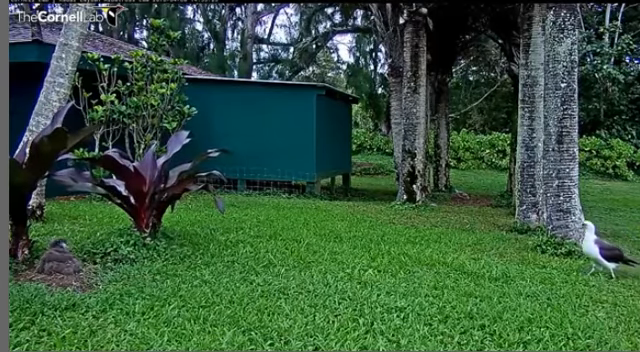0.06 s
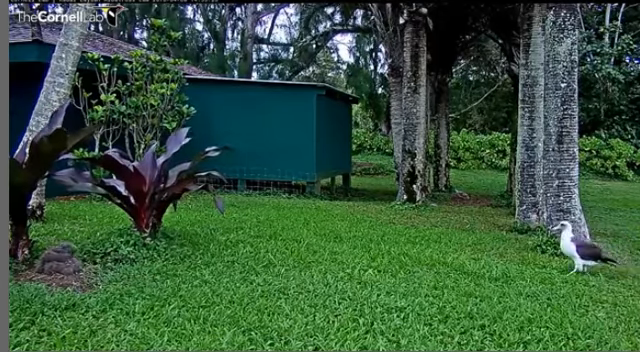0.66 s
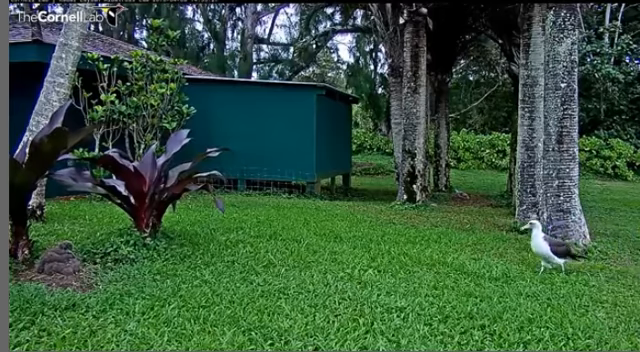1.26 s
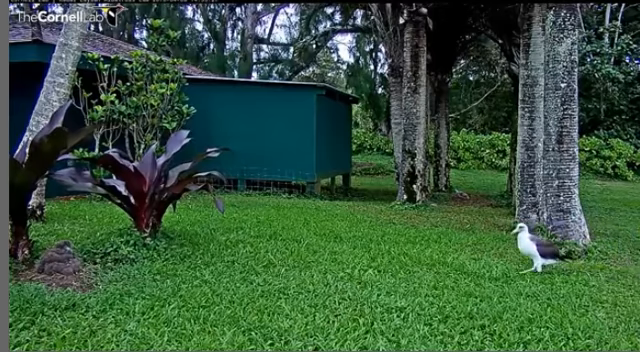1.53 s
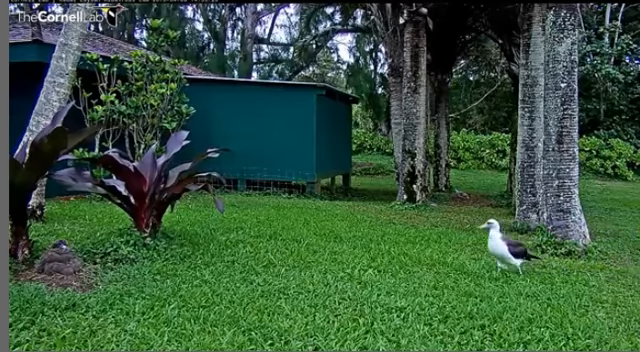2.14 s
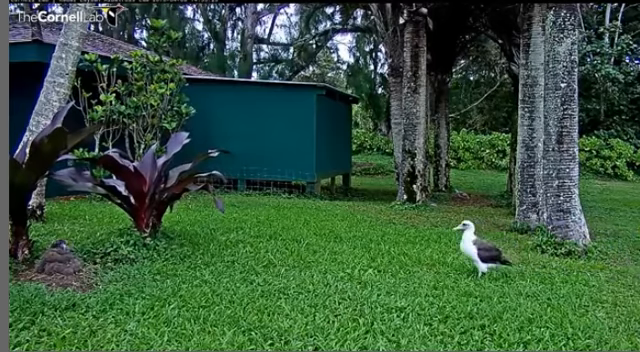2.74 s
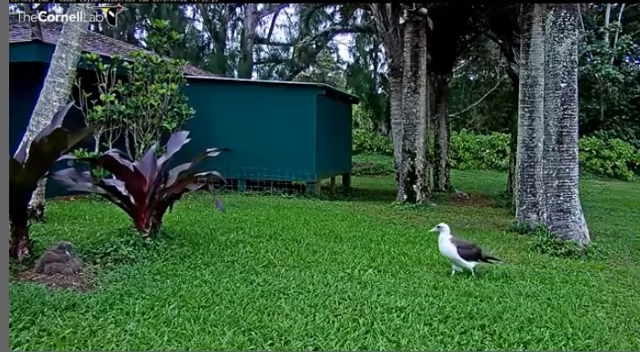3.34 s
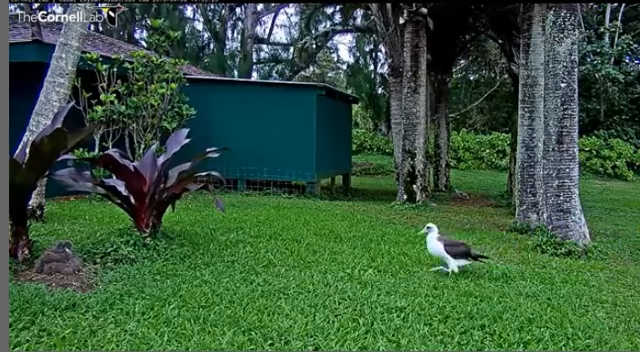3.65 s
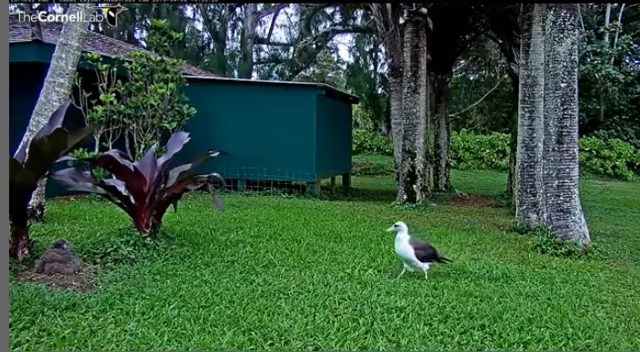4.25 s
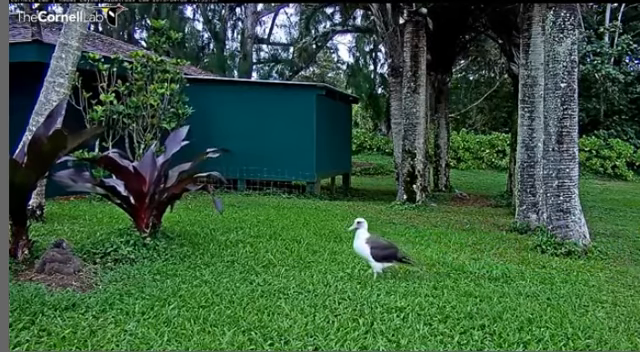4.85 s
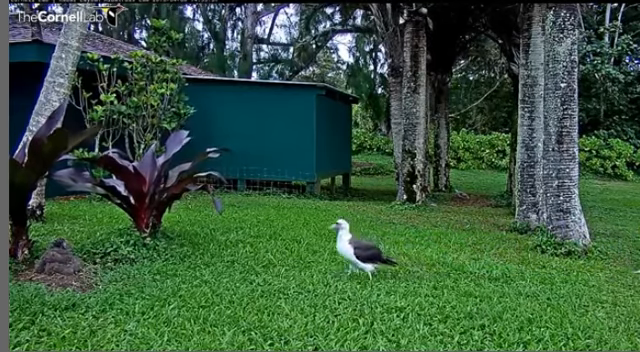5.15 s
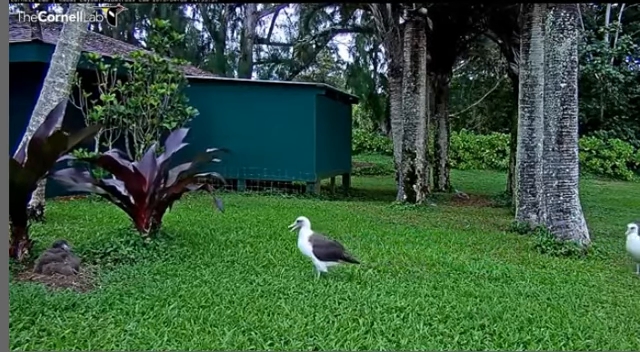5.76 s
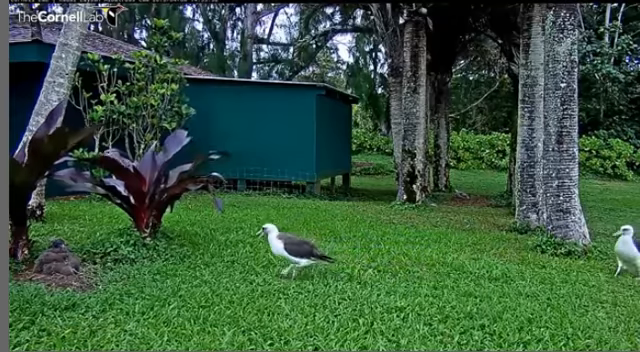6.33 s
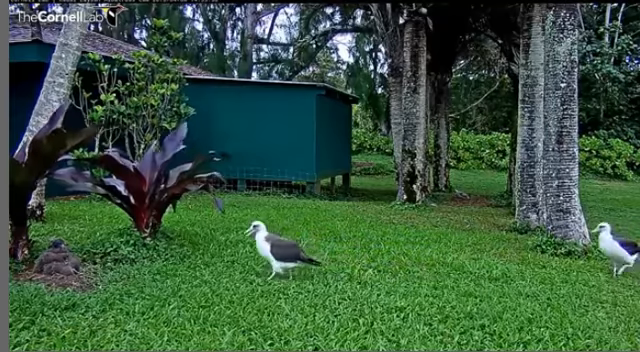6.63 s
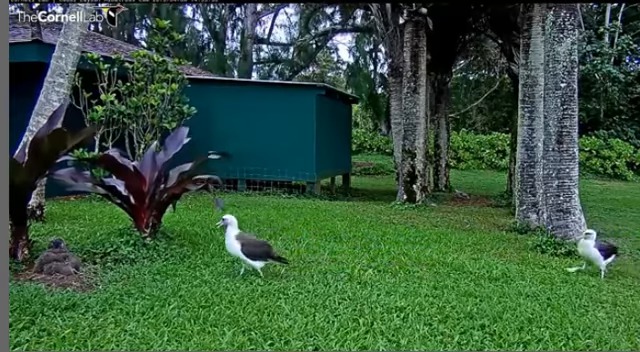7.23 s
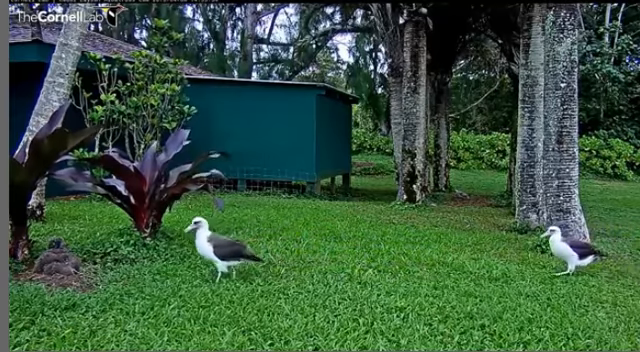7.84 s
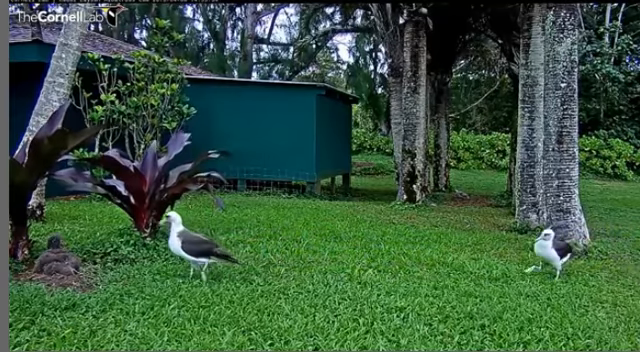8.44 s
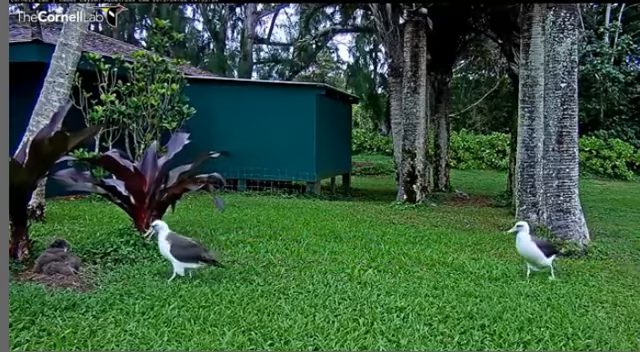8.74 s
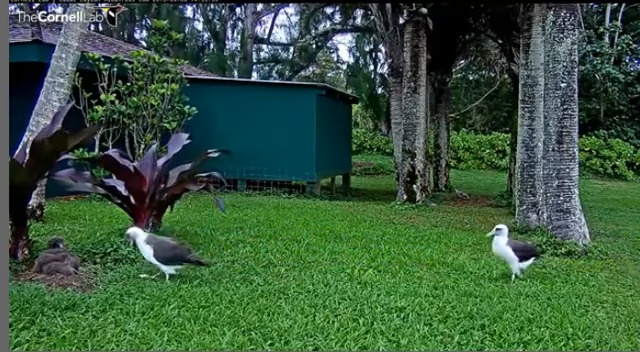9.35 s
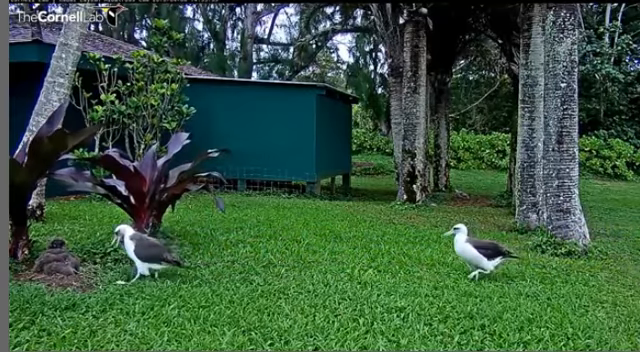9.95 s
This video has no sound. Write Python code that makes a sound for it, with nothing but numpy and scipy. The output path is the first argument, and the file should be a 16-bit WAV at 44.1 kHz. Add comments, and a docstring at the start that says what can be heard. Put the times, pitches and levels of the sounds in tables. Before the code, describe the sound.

A steady outdoor hiss runs throughout, with the faint hum of a camera motor underneath. Small birds whistle, chip and twitter far off in the trees, many of their notes falling in pitch. There is a faint tick at about 0.8 seconds and another at 4.4, where the sound drops out for a tenth of a second with a soft thump. Dull, quiet hand bumps on the camera follow around 4.6, 5.3 and 6.5 seconds. A nearer albatross gives three short, rising squeals with slightly rough starts at about 6.2, 6.7 and 7.1 seconds, far louder than the background. Soft squeaks follow around 7.4 and 8 seconds, and one clearer distant whistle comes at 8.4. The albatross squeals three more times at about 9.1, 9.5 and 9.8 seconds. Its calls carry a short, dull reflection from the lawn, trees and shed.

```python
"""Albatross calls on a tree-ringed lawn.

At a nest one albatross squeals in two runs of three, with soft squeaks between: its throat and bill
filter the harmonics of its syrinx, and the ground, trees and a shed reflect them. Small birds whistle
far off, over a steady outdoor hiss and the hum of a camera motor. There are two faint ticks and a few
dull bumps of a hand, and the sound drops out once for a tenth of a second."""
import sys
import numpy as np
from scipy import signal
from scipy.fft import rfft, irfft
from scipy.io import wavfile

SR = 44100
rng = np.random.default_rng(int(sys.argv[2]) if len(sys.argv) > 2 else 0)


def put_to_file(sound):
    """Save the sound as 16-bit audio at rate SR, in the file named by the first command-line argument."""
    columns = np.atleast_2d(sound).T  # one column per channel
    safe = np.clip(columns, -1, 1)
    whole_steps = np.round(safe * 32767)
    wavfile.write(sys.argv[1], SR, whole_steps.astype(np.int16))


N = 440559
TIME = np.arange(N) / SR


def from_db(db):
    """Amplitude ratio of a level in decibels."""
    return 10 ** (np.asarray(db) / 20)


def rms_one(x):
    """Normalisation to unit mean power."""
    return x / np.sqrt(np.mean(x ** 2) + 1e-20)


def at_hz(points, hz):
    """Interpolation of a spectrum on a logarithmic frequency axis."""
    points = np.array(points)
    return np.interp(np.log(np.maximum(hz, 1)), np.log(points[:, 0]), points[:, 1])


def drift(rate_hz, size):
    """Random modulation: white noise smoothed by two poles, with a spread of about 1."""
    pole = np.exp(-2 * np.pi * rate_hz / SR)
    run_in = SR // 2
    wander = signal.lfilter([1], [1, -2 * pole, pole * pole], rng.standard_normal(size + run_in))
    return rms_one(wander)[run_in:]


def lowpass(x, hz, order):
    """Low-pass filtering: attenuation of the treble above hz."""
    return signal.sosfilt(signal.butter(order, hz, fs=SR, output="sos"), x)


def add(out, start_s, sound):
    """Superposition of a sound at its starting time."""
    i = max(int(start_s * SR), 0)
    out[i:i + len(sound)] += sound[:max(N - i, 0)]


def arch(length_s):
    """Amplitude envelope: progress 0-1 through a short sound, and its rise and fall."""
    progress = np.linspace(0, 1, int(length_s * SR))
    return progress, np.sin(np.pi * progress) ** 0.28


def hiss(level_db=-41, waver_db=0.57, swell_below_hz=900):
    """Broadband noise of distant air, leaves and the microphone; its low band swells slowly."""
    # noise spectrum, lower and upper part: (frequency [Hz], relative density [dB])
    low_spectrum = [(25, -5.5), (60, -21), (100, -19), (170, -17.5), (260, -10), (330, -0.5), (430, 3),
                    (520, 3), (720, -0.5), (1000, 1.5), (1300, -4.5), (1900, -7)]
    high_spectrum = [(2350, -3), (2850, 1.5), (3300, -5.5), (4000, -11), (4700, -23.5), (5400, -35.5),
                     (6500, -44.5), (7700, -55), (15000, -58)]
    # swell of the low band: (time [s], gain [dB])
    swell = [(0, 0.5), (1, 0), (2.5, -0.4), (4, -0.5), (5.3, 0.5), (6.6, -0.5), (8, -1.5), (10, -1)]
    hz = np.arange(N // 2 + 1) * SR / N
    colour = from_db(at_hz(low_spectrum + high_spectrum, hz))
    noise = rms_one(irfft(rfft(rng.standard_normal(N)) * colour, N))
    low_band = irfft(rfft(noise) / (1 + (hz / swell_below_hz) ** 4), N)
    swell_gain = from_db(np.interp(TIME, *np.transpose(swell)))
    return (noise + low_band * (swell_gain - 1)) * from_db(level_db + waver_db * drift(5.2, N))


def motor(speed_spread=.0012, waver_db=0.54):
    """Line spectrum of the camera motor: all partials follow one slightly uneven speed."""
    # motor and hum partials: (frequency [Hz], rms level [dB])
    partials = [(60, -68.5), (119.9, -78.5), (179.9, -62.5), (215, -76.5), (231.3, -71), (270, -73),
                (299.9, -61.5), (325, -68), (346.6, -59.5), (419.7, -54.5), (462.1, -52.5), (577.5, -66)]
    uneven_time = TIME + speed_spread * np.cumsum(drift(3.18, N)) / SR
    out = np.zeros(N)
    for hz, level_db in partials:
        amplitude = np.sqrt(2) * from_db(level_db + waver_db * drift(1.7, N))
        out += amplitude * np.sin(2 * np.pi * (hz * uneven_time + rng.random()))
    return out


def whistle(length_s, start_hz, end_hz, level_db, dull_db=-22, flicker_db=3.5, ramp_s=.004):
    """Frequency-modulated pure tone: the glide levels out, wide glides waver, high notes are fainter."""
    progress, envelope = arch(length_s)
    glide_hz = (start_hz - end_hz) * (1 - progress) ** 1.7
    waver_hz = .04 * np.sqrt(end_hz * abs(start_hz - end_hz)) * drift(110, len(progress))
    hz = end_hz + glide_hz + waver_hz
    air_db = at_hz([(4000, 0), (5000, dull_db / 3), (6500, dull_db)], hz)
    gain = from_db(level_db + air_db + flicker_db * drift(46, len(progress)))
    ramps = np.minimum(np.minimum(progress, 1 - progress) * length_s / ramp_s, 1)
    return gain * ramps * np.sqrt(envelope) * np.sin(2 * np.pi * np.cumsum(hz) / SR)


def songbirds(twitter_count=70):
    """Tonal song of far birds: slurs, chips and whistles over a random twitter from deeper in the trees."""
    # one bird's falling slurs: (time [s], start pitch [Hz], base level [dB])
    slurs = [(.23, 5700, -63), (1.2, 6450, -54.5), (1.73, 6000, -56), (4.471, 6300, -59), (4.77, 5520, -59),
             (5.101, 5615, -50.5), (5.41, 6000, -61), (9.33, 5830, -61)]
    # a second bird's short chips: (time [s], base level [dB])
    chips = [(2.38, -51), (2.77, -51), (5.52, -49), (8.07, -49.5)]
    # far birds' falling and nearly level whistles:
    # (time [s], length [s], start pitch [Hz], end pitch [Hz], base level [dB])
    whistles = [(.46, 0.1, 5400, 5060, -60), (1.061, .08, 5450, 4550, -51.5),
                (1.483, 0.12, 3950, 3720, -53), (3.438, 0.31, 1055, 1071, -48.5),
                (5.011, 0.045, 3820, 3950, -46), (6.879, 0.11, 4480, 3920, -53),
                (8.32, 0.088, 4830, 4520, -54), (8.404, 0.11, 3282, 3297, -39.5),
                (9.65, 0.15, 5050, 4300, -58.5)]
    out = np.zeros(N)
    for start_s, start_hz, level_db in slurs:
        add(out, start_s, whistle(length_s=.14, start_hz=start_hz, end_hz=3880, level_db=level_db))
    for start_s, level_db in chips:
        add(out, start_s, whistle(length_s=.055, start_hz=4050, end_hz=3480, level_db=level_db))
    for start_s, *note in whistles:
        add(out, start_s, whistle(*note))
    for when, height, glide in rng.random((twitter_count, 3)):
        end_hz = 3450 + 1000 * height
        start_hz = end_hz + 700 * glide
        add(out, when * N / SR, whistle(.064, start_hz, end_hz, level_db=-58 - 7 * height))
    return out


def clearing(x, scatter_db, dull_hz, build_s=0.011, t60_s=.28):
    """Reflection and scattering: direct sound, distinct echoes and a short, dull tail from the trees."""
    # reflections from ground, trunks and shed wall: (delay [s], gain [dB])
    echoes = [(.004, -18), (.009, -14), (0.0176, -18), (.035, -21.5), (.048, -19), (.069, -22.5)]
    t = TIME[:SR]
    envelope = from_db(-60 * t / t60_s) * (1 - np.exp(-t / build_s))
    scatter = lowpass(rng.standard_normal(SR), dull_hz, order=4) * envelope
    passband_gain = np.sqrt(np.sum(scatter ** 2) * SR / (2 * dull_hz))
    response = from_db(scatter_db) * scatter / passband_gain
    for delay_s, gain_db in echoes:
        add(response, delay_s, from_db([gain_db]))
    return x + signal.fftconvolve(x, response)[:N]


def ticks(dull_hz=3500):
    """Impulses, slightly smoothed, heard as faint sharp clicks."""
    # clicks: (time [s], level before smoothing [dB])
    impulses = [(0.778, -32), (4.352, -26.5)]
    out = np.zeros(N)
    for start_s, level_db in impulses:
        add(out, start_s, from_db([level_db]))
    return lowpass(out + 1e-18, dull_hz, order=1)


def bumps(band_hz=(90, 300)):
    """Structure-borne noise: a hand rubs the camera body in dull, low bursts."""
    # rubs of the hand: (time [s], length [s], level [dB])
    rubs = [(4.62, 0.26, -57.5), (5.346, 0.044, -47), (6.499, 0.14, -54)]
    band = signal.butter(2, band_hz, "band", fs=SR, output="sos")
    out = np.zeros(N)
    for start_s, length_s, level_db in rubs:
        _, envelope = arch(length_s)
        rumble = rms_one(signal.sosfilt(band, rng.standard_normal(len(envelope))))
        add(out, start_s, from_db(level_db) * envelope * rumble)
    return out


def voice(pitch_hz, rough, posture_db, jitter=0.095, flutter_db=3.0, rasp=0.62, air=0.11):
    """Source and filter: throat resonances shape the syrinx's harmonics; roughness makes cycles uneven."""
    # response of throat and bill: (frequency [Hz], relative gain [dB])
    throat = [(300, -45), (700, -11), (950, -7), (1500, -12), (1900, -16), (2350, -9), (2680, -1),
              (3020, 4.5), (3280, 1), (3600, -12), (4600, -23.5), (5200, -38.5), (6300, -57.5),
              (9000, -73.5)]
    size = len(pitch_hz)
    low_db, mid_db, high_db = posture_db
    facing = [(900, low_db), (1800, mid_db), (2600, 0), (3300, 0), (4500, high_db)]
    phase = 2 * np.pi * np.cumsum(pitch_hz * (1 + jitter * rough * drift(420, size))) / SR
    tone, power = 0, 0
    for k in range(1, 10):
        hz = k * pitch_hz
        gain = from_db(at_hz(throat, hz) + at_hz(facing, hz) + flutter_db * drift(45, size))
        sidebands = rasp * rough * (drift(300, size) + 1j * drift(300, size))
        harmonic = np.exp(1j * (k * phase + rng.uniform(0, 2 * np.pi)))
        tone += gain * np.real((1 + sidebands) * harmonic)
        power += gain ** 2 * (1 / 2 + (rasp * rough) ** 2)
    # turbulence puffs once a cycle and fills the spectrum between the harmonics
    puffs = rng.standard_normal(size) * (1 + np.cos(phase))
    hz = np.arange(size // 2 + 1) * SR / size
    turbulence = rms_one(irfft(rfft(puffs) * from_db(at_hz(throat, hz) + at_hz(facing, hz)), size))
    breath = np.clip(air + rough ** 2, 0, .9)
    # a clear note grows louder as a harmonic slides onto a resonance
    boost = rms_one(np.sqrt(power) ** 0.42) ** (1 - rough)
    return boost * (np.sqrt(1 - breath ** 2) * tone / np.sqrt(power) + breath * turbulence)


def squeals(attack_s=0.00299, release_s=.009, onset_s=.008, catch_s=0.005, flick_s=.007):
    """Register change: a clear low note catches as it climbs to a higher one, then flicks upward."""
    # albatross calls: (time [s], length [s], opening crack [s], middle of climb [s], climb length [s],
    # low pitch [Hz], high pitch [Hz], low note's base level [dB], high note's base level [dB],
    # catch time [s], catch depth [dB], posture gain at 900 Hz [dB], at 1800 Hz [dB], at 4500 Hz [dB]);
    # climb and catch count from the call's start; posture is how the bird faces and opens its bill
    calls = [(6.248, 0.088, 0.0029, .031, .068, 794, 1023, -24.5, -25, .045, 0.5, 2, 4.5, 0.5),
             (6.677, 0.11, 0.012, 0.045, 0.03, 794, 902, -24.5, -23.5, 0.055, 5.5, 0, -.5, -2.5),
             (7.071, 0.11, 0.012, .065, .033, 762.6, 880, -24, -22.5, 0.053, 2, 2.5, -4, 6),
             (9.067, 0.075, 0, .021, 0.062, 734, 951, -27, -23, .027, 7, -11, -2, 1),
             (9.450, 0.13, .018, .071, 0.059, 782, 928, -26.5, -26, .063, 12, -9, -1, -1),
             (9.839, 0.13, .017, 0.085, 0.063, 751, 890, -24, -25.5, 0.074, 7, -6, -11.5, -3.5)]
    out = np.zeros(N)
    for (start_s, length_s, crack_s, climb_at_s, climb_s, low_hz, high_hz,
         low_db, high_db, catch_at_s, catch_db, *posture_db) in calls:
        t = np.arange(-attack_s / 2, length_s + release_s, 1 / SR)
        onset = np.exp(-np.maximum(t, 0) / onset_s)
        crack = np.exp(-(t / crack_s) ** 2) if crack_s > 0 else 0   # most calls open high and rough
        climb = (1 + np.sin(np.pi * np.clip((t - climb_at_s) / climb_s, -.5, .5))) / 2
        catch = np.exp(-((t - catch_at_s) / catch_s) ** 2)
        flick = np.exp(np.minimum(t - length_s, 0) / flick_s)
        pitch_hz = low_hz + (high_hz - low_hz) * climb + 356.8 * crack + 65.4 * flick
        dip_db = 7 * onset + 4 * crack + catch_db * catch + 5.5 * flick
        level_db = low_db + (high_db - low_db) * climb - dip_db
        rough = np.clip(0.083 + .75 * crack + 0.25 * flick, 0, 1)
        gate = np.interp(t, [t[0], attack_s / 2, length_s, t[-1]], [0, 1, 1, 0])
        add(out, start_s + t[0], gate * from_db(level_db) * voice(pitch_hz, rough, posture_db))
    return out


def squeaks(rough=0.31, posture_db=(0, 0, -4)):
    """Weak phonation: the same voice, barely sounded, in short linear glides."""
    # notes between the runs: (time [s], length [s], start pitch [Hz], end pitch [Hz], base level [dB])
    notes = [(7.402, .035, 738, 708, -40), (7.479, 0.037, 696, 744, -37), (8.033, .05, 705, 753, -41)]
    out = np.zeros(N)
    for start_s, length_s, start_hz, end_hz, level_db in notes:
        progress, envelope = arch(length_s)
        pitch_hz = start_hz + (end_hz - start_hz) * progress
        add(out, start_s, from_db(level_db) * envelope * voice(pitch_hz, rough, posture_db))
    return out


def scene():
    """Superposition of birds and background; far birds have more scattered sound than the near one."""
    albatross = lowpass(squeals() + squeaks() + 1e-18, hz=6200, order=6)
    near = clearing(albatross, scatter_db=-15, dull_hz=3400)
    far = clearing(songbirds(), scatter_db=-6, dull_hz=7000)
    return (near + far + hiss() + motor() + bumps() + ticks())[None]


def record(dry, stop_s=4.3525, back_s=4.465, offset=0.0095, cutoff_hz=17000):
    """Gating and band limiting: the dropout also cuts a small steady offset, so it thumps softly."""
    gate = np.interp(TIME, [stop_s, stop_s + .0015, back_s - .013, back_s + .013], [1, 0, 0, 1])
    end_fades = np.clip(np.minimum(TIME, TIME[-1] - TIME) / .004, 0, 1)
    gated = (dry * end_fades + offset) * gate
    top_cut = signal.cheby2(12, 70, cutoff_hz, fs=SR, output="sos")
    return signal.sosfilt(top_cut, gated - offset) + offset


dry = scene()
out = record(dry)
put_to_file(out)
```